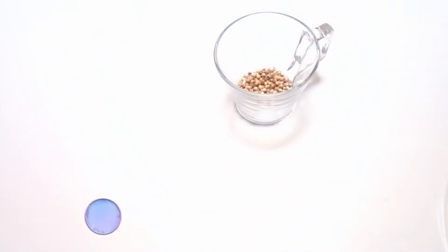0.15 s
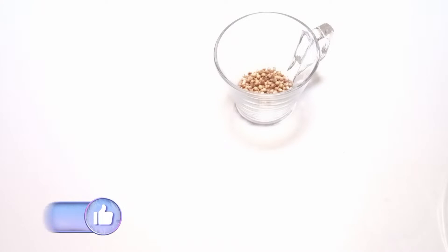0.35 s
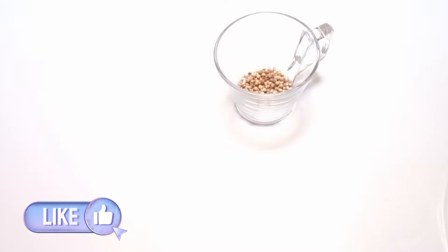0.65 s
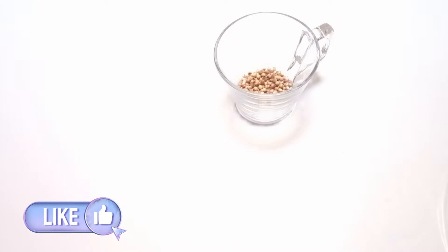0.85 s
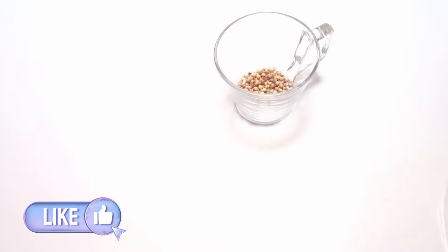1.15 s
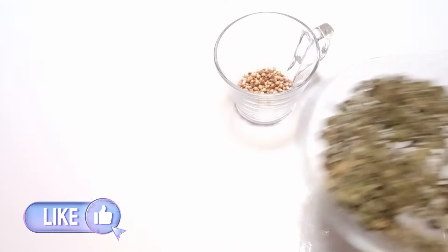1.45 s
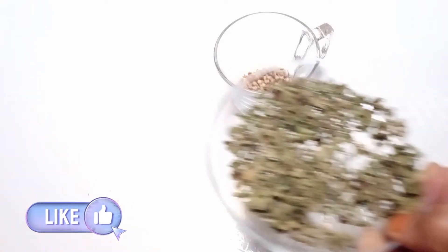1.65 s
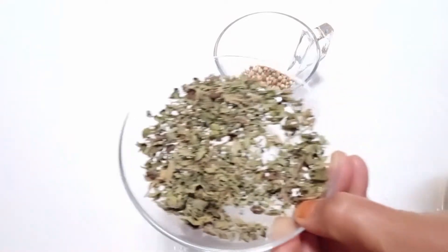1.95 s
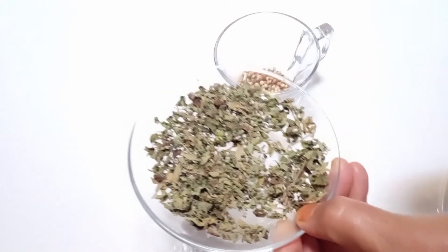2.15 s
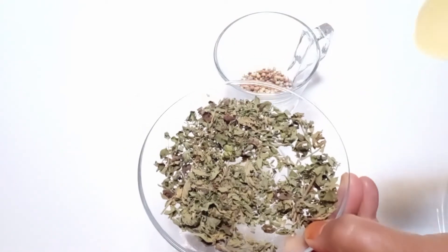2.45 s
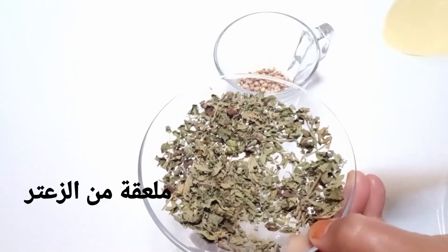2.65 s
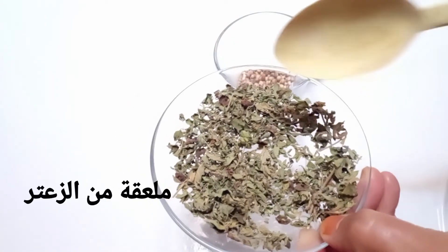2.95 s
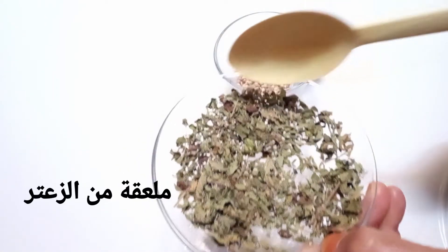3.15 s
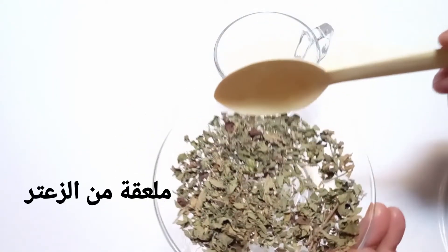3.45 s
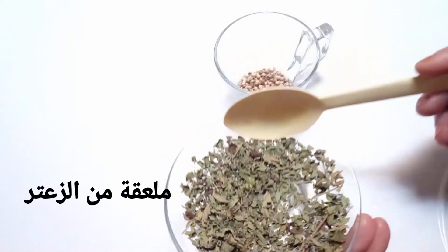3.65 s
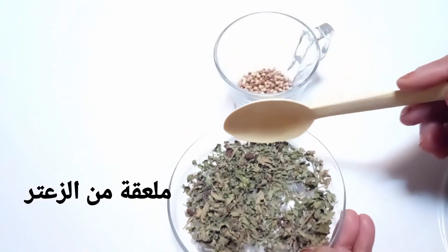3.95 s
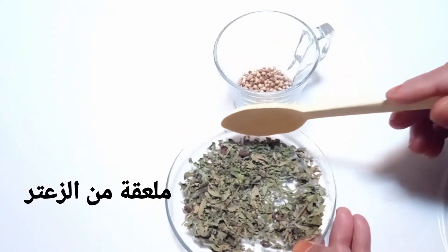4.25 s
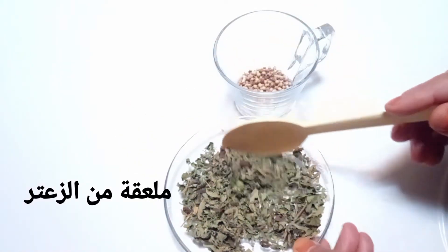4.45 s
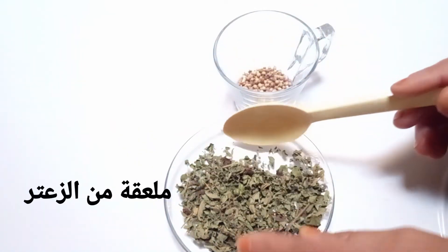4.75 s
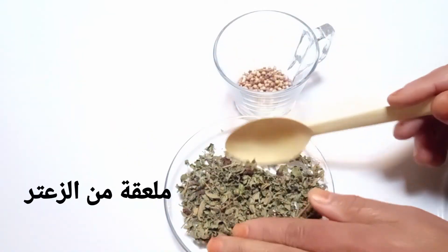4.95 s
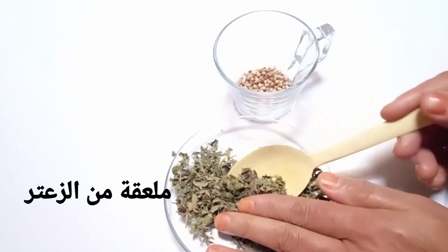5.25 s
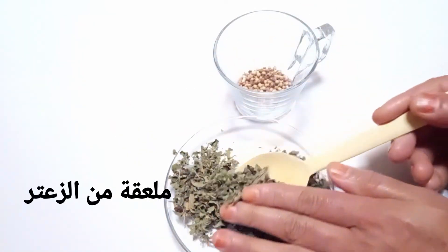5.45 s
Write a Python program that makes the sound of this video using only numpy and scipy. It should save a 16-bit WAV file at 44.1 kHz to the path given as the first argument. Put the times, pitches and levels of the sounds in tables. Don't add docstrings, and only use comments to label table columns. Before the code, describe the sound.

In a quiet room, a glass dish ticks faintly, is knocked sharply by a wooden spoon, thuds onto a table, and dry leaves crackle.

```python
import sys
import numpy as np
from scipy import signal
from scipy.io import wavfile
from scipy.ndimage import uniform_filter1d

SR = 44100
rng = np.random.default_rng(int(sys.argv[2]) if len(sys.argv) > 2 else 0)


def dump(signal):
    limited = np.clip(np.atleast_2d(signal).T, -1, 1)
    pcm = np.round(limited * 32767).astype(np.int16)
    wavfile.write(sys.argv[1], SR, pcm)


def nominal_scale(level):
    x = np.asarray(level, float) / 20
    return 10 ** x


N = 246959

# frequency in Hz, level in dB per Hz.
HUM_SPECTRUM = [(24, -38.5), (40, -4.5), (66, -7.5), (96, -22), (144, -12), (215, -15), (270, 0.5),
                (306, -17), (347, -7), (374, -16.5), (446, -13.5), (997, -29.5), (5780, -40.5),
                (10100, -39.5), (16200, -55.5)]
HUM_DB = -59
# time in seconds, hum swell in dB.
SWELL = [(0, -2.5), (.4, 1), (.75, 9), (1.1, 3.5), (1.6, 0.5), (2.601, -1.5), (3., 3.), (3.4, -2),
         (4.5, 1.), (5.6, 0.)]
# frequency in Hz, share of the swell.
SWELL_SHARE = [(60, 0.3), (300, 0.11), (1500, 0.79), (5000, 0.91), (12000, 0.14)]
# frequency in Hz, left-right likeness.
LIKENESS = [(60, 0.9), (130, 0.46), (290, 0.62), (640, -0.0064), (1410, -0.12), (3100, 0.058), (6820, -0.2),
            (15000, -0.098)]

# frequency in Hz, T60 in seconds, echo level in dB, left-right likeness.
ROOM = [(100, 0.28, -6, 1), (301.7, 0.7, -2.5, 0.97), (1010, 0.36, 0, .5), (2940, 0.4, -0.5, .1),
        (6000, 0.33, 0.5, .05), (10500, .3, -0.5, 0.044), (11300, .15, -28, .05), (12900, .15, -28, .05),
        (13600, .28, -5, .05), (15000, .12, -20.5, .05)]
SHIFT_HZ = 6.5

# start in seconds, level in dB.
BOOMS = [
    (.6, -60),
    (2.375, -58),
    (4.25, -52),
]
BOOM_HZ, BOOM_RISE_S, BOOM_T60_S = 66, .04, .7

# frequency in Hz, level in dB.
LEAF_SPECTRUM = [(1500, -36.5), (2500, -13), (4300, -11.5), (6500, -6.5), (9600, 0.5), (11000, -3.5),
                 (13000, -10.5), (15600, -11.5), (16200, -22.5)]
# start in seconds, level in dB, T60 in seconds.
JOLTS = [(0., -73, 0.77), (.495, -62, 1.02), (3.42, -69, 0.58), (4.44, -71, .6), (5.104, -59.5, 1.2),
         (5.497, -58.5, 0.76)]
JOLT_RISE_S = 0.0071
# middle in seconds, level in dB, half length in seconds.
STROKES = [(.58, -68.5, .06), (0.905, -77, 0.46), (1.134, -72, 0.053), (1.4, -76, .12), (1.69, -76, 0.24),
           (2.15, -89, .2), (2.89, -77.5, 0.089), (3.273, -79.5, 0.19), (3.7, -79.5, .2),
           (4.541, -68, 0.039), (4.635, -66, 0.075), (5.057, -78, 0.045), (5.21, -65, .05),
           (5.287, -58.5, 0.064), (5.394, -65.5, 0.16), (5.573, -59.5, 0.033)]
# start in seconds, peak level in dB, left-right difference in dB.
SNAPS = [(4.5246, -56, 5), (5.1054, -40.5, 11.5), (5.1084, -41, 1.0), (5.1186, -36, -2), (5.1325, -39, 1.5),
         (5.1384, -46, -1), (5.1446, -39, 5), (5.1516, -40.5, -1), (5.1597, -47, 12), (5.2053, -47, 13),
         (5.2674, -44, -8), (5.2804, -43, 10), (5.2978, -41, 4), (5.389, -51, 3), (5.499, -39.5, 6),
         (5.5187, -46, -4), (5.5546, -43, 2.0)]
SNAP_HZ, SNAP_SPREAD = 10000, .05
HISS_TOP_HZ, MIC_TOP_HZ = 15850, 16800

# start in seconds, peak level in dB,
# left-right difference in dB, centre in Hz, T60 in milliseconds.
HARD = [(0.493, -35, -2, 4800, 10), (2.3686, -23, -1.5, 3400, 6), (2.3676, -24, 0, 800, 9),
        (2.3681, -27, 0, 1600, 8.3), (3.4191, -43, -7, 9950, 30), (4.186, -41, -4, 700, 7),
        (4.1856, -28, -11, 5520, 6.1), (4.2393, -21.5, 3, 950, 3.1), (4.2424, -30, -8, 2300, 7),
        (4.269, -46, 3, 2000, 6), (4.793, -52, 4, 4020, 8.1), (4.793, -45, -0.5, 1360, 5.3),
        (5.0003, -46, 0, 888, 8.9), (4.9992, -56, -14, 2785, 6)]
# start in seconds, peak level in dB,
# left-right difference in dB, centre in Hz, T60 in milliseconds.
LIGHT = [(4.431, -35, -8, 10200, 8), (.003, -58.5, -3, 4030, 16), (0.4928, -44, -3, 2730, 9.8),
         (0.4995, -45, -17, 7500, 6), (.5497, -39.5, -12.5, 8400, 18), (.602, -59, -12, 7600, 14),
         (2.3757, -23, -8.5, 3800, 10.4), (4.074, -61, -2.5, 1550, 20), (4.251, -34.5, -4, 4200, 6),
         (4.258, -40, 3, 7000, 6), (4.567, -61, 6, 2500, 40), (4.9945, -55, 4.5, 12000, 7.7)]
HARD_WIDTH, LIGHT_WIDTH = 0.97, .42
# start in seconds, peak level in dB,
# left-right difference in dB, centre in Hz.
KNOCKS = [(2.3679, -18, 2, 1650), (2.3680, -17, -2, 3600), (2.3795, -33, 0, 1400), (2.3797, -34, 0, 3400),
          (4.1857, -40, 0, 500), (4.2385, -25, 0, 2200), (4.2422, -25, 0, 1700), (4.591, -58, 0, 2000)]

TABLE_HZ = [144, 189, 226, 298, 457, 586, 750]
# level in dB, T60 in seconds.
TABLE_MODES = [(-2, 0.13), (2.5, 0.11), (-3.5, 0.09), (-4, 0.11), (-15.5, .05), (-9.5, 0.045),
               (-15.5, 0.07)]
# time in seconds, level in dB, contact time in milliseconds.
THUDS = [(2.368, -33.5, 0.26), (4.185, -50.5, 0.59), (4.2383, -15, 0.54), (4.2425, -33, 2.9),
         (4.2692, -25, 1.5), (4.59, -38.5, 1.17), (4.70, -63, 3.1), (4.794, -63, 0.43), (4.9982, -40, 0.5),
         (5.024, -74, 1.5), (5.149, -50, 0.89), (5.24, -50.5, 1.4)]

RIM_HZ = [1647, 2125, 2440, 2837, 3470, 3520, 3625, 4645, 4680, 4890, 5480, 5580, 5733, 5865]
RIM_TOP_HZ = [6752, 7830, 7930, 9498, 10345, 13290, 13555, 13850, 14030]
TWIN_HZ = [3505, 4622, 4657, 5535, 5600, 6775, 7923, 10380, 13300, 13570, 14010, 4700, 5565, 5640, 7890,
           13520]
EDGE_HZ = [1622, 2445, 3480, 4738, 4900, 5575, 6750, 7903, 9502, 10370, 13217, 14023]
FOOT_HZ = [1209, 1620, 2131, 3424, 3480, 4670, 5570, 6750, 7850, 9515, 10385, 13240]
HELD_HZ = [4702, 6840, 9520, 9630, 13240]
SIDE_HZ = [2123, 2444, 3490, 4740, 6750, 7910]
BOWL_HZ = [1645, 2440, 3491, 5636, 6750, 9560]
LIP_HZ = [5600, 7910]
ROCK_HZ = [5570, 6750, 9510, 10380, 13230]
TICK_HZ = [4702, 6826, 9504, 13207]
# level in dB, left-right difference in dB,
# sign of the lobe facing right, T60 in seconds.
RIM = [(-35, 6.5, 1, 0.025), (-52, 7, 1, 0.47), (-54, -7.5, 1, .1), (-51, 4.5, 1, .08), (-30, -8, -1, 0.03),
       (-43.5, 6.5, -1, 0.11), (-37.5, 0, 1, 0.061), (-23, 7.5, -1, 0.035), (-35.5, 6, -1, 0.15),
       (-36, -4.5, 1, 0.1), (-33, 1.5, 1, 0.043), (-23, 3, 1, 0.025), (-31, -5, 1, 0.049),
       (-39.5, -7.5, 1, .08)]
RIM_TOP = [(-28, 16.5, -1, 0.046), (-38.5, -8, -1, .12), (-30, -6.5, 1, 0.018), (-29.5, 11.5, 1, 0.041),
           (-14.5, -1.5, 1, 0.016), (-41.5, 10, 1, 0.046), (-32, 18, -1, 0.021), (-45.5, 6.5, 1, .08),
           (-41, -1, -1, 0.053)]
TWIN = [(-55, 4.5, 1, 0.55), (-48, -1, 1, 0.26), (-42.5, 1, 1, 0.48), (-46, 5.5, 1, 0.24),
        (-51, 1, 1, 0.48), (-48, 6, 1, 0.22), (-51, 7.5, 1, 0.33), (-50.5, 5, 1, 0.28), (-62, 8, 1, .25),
        (-56, 8, 1, .27), (-62, 6, 1, .22), (-54, 3, 1, .4), (-54, -2, 1, .5), (-55, 3, 1, .45),
        (-55, 0, 1, .35), (-60, 8, 1, .25)]
EDGE = [(-41, 12, 1, 0.056), (-55, 6, 1, 0.23), (-36.5, 12, -1, 0.031), (-46.5, 7, -1, 0.3),
        (-45, 2, 1, 0.07), (-33, 1, 1, 0.023), (-40.5, 18, 1, 0.034), (-59, -8, 1, 0.07),
        (-31, 6.5, 1, 0.033), (-35, -2, -1, 0.017), (-44.5, 15, 1, .04), (-55, -3, -1, .06)]
FOOT = [(-44.5, 0, 1, 0.036), (-40, -1, 1, 0.061), (-70, -11, 1, 0.19), (-57, 19, 1, 0.27),
        (-49.5, -13, 1, 0.22), (-50, 5, 1, .12), (-30, 0, 1, 0.022), (-48, 8, 1, 0.056),
        (-42.5, 9, 1, 0.028), (-43, 12, -1, .05), (-41, 12, -1, 0.043), (-53, 15, 1, .04)]
HELD = [(-69.5, -1, 1, 0.087), (-66, 2, 1, 0.12), (-60, -12, 1, 0.057), (-65, 13, 1, 0.021),
        (-63, -15, 1, 0.036)]
SIDE = [(-57, 3, 1, .35), (-51, -4, 1, 0.09), (-64, 14, 1, 0.034), (-66, 7, -1, 0.22), (-69, 6, 1, .06),
        (-65.5, -2.5, 1, 0.1)]
BOWL = [(-50, 2, 1, 0.071), (-72, 2, 1, 0.5), (-65.5, 14, -1, 0.067), (-66, 11, -1, 0.045),
        (-68, 8, 1, .04), (-63.5, -5, 1, 0.065)]
LIP = [(-66.5, 0.0015, 1, .05), (-71, 0, 1, .06)]
ROCK = [(-49, 7, 1, 0.032), (-56, 4, 1, .04), (-44.5, 11, 1, 0.033), (-55, 10, 1, 0.083),
        (-55, 20, 1, 0.037)]
TICK = [(-66, 3, 1, 0.043), (-77, -5, 1, .08), (-58, -12, 1, 0.084), (-72, -14, 1, .04)]
PLACES = dict(
    rim=(RIM_HZ + RIM_TOP_HZ + TWIN_HZ, RIM + RIM_TOP + TWIN),
    edge=(EDGE_HZ, EDGE), foot=(FOOT_HZ, FOOT), held=(HELD_HZ, HELD), side=(SIDE_HZ, SIDE),
    bowl=(BOWL_HZ, BOWL), lip=(LIP_HZ, LIP), rock=(ROCK_HZ, ROCK), tick=(TICK_HZ, TICK),
    hum=([4740], [(-74.0, 0, 1, 1.3)]),
    wobble=([2441], [(-44, 1, 1, 0.5)]),
    note=([2441], [(-41, 1, 1, .52)]))
# start in seconds, strength in dB, place struck.
BLOWS = [(.196, -9, "held"), (.211, -7, "held"), (0.234, -6, "held"), (0.2521, -6, "held"),
         (.272, -10, "held"), (0.417, -0.5, "tick"), (2.368, 0, "rim"), (3.5, -14, "hum"),
         (4.1861, -1, "edge"), (4.1921, 1, "wobble"), (4.206, -21.5, "edge"), (4.2425, -1, "foot"),
         (4.2425, -1, "note"), (4.258, -15, "foot"), (4.365, -13.5, "rock"), (4.569, -8, "tick"),
         (4.707, -8, "lip"), (4.7257, -0.5, "lip"), (4.793, -5, "side"), (4.793, -24, "note"),
         (4.998, 0.5, "bowl"), (5.021, -27.5, "rock")]
GRIP_S, GRIP_T60_S = 4.45, 0.3
BLOW_RISE_S, WOBBLE_RISE_S = .0003, .025
NOTE_SENT_DB = -10
FLUTTER_DB, FLUTTER_MIN_HZ, FLUTTER_MAX_HZ, FLUTTER_ONSET_S = 2.5, 10, 70, .03


def evened(x):
    return x / np.sqrt(np.mean(x ** 2) + 1e-20)


def read(points, hz):
    f, value = np.transpose(points)
    return np.interp(np.log(hz + 1), np.log(f + 1), value)


def add(mix, s, sound):
    part = mix[:, round(s * SR):][:, :sound.shape[-1]]
    part += sound[..., :part.shape[1]]


def lean(db):
    return nominal_scale(np.array([[db / 2], [-db / 2]]))


def noise(level_db, patchy_db, size):
    hop = size // 4
    frames, hz = N // hop + 5, np.fft.rfftfreq(size, 1 / SR)[:, None]
    a, b, c, d, patches = rng.standard_normal((frames, len(hz), 5)).T
    patches = uniform_filter1d(patches, size=8, axis=0)
    patches = evened(uniform_filter1d(patches, size=10, axis=1))
    same = np.clip(read(LIKENESS, hz), -1, 1)
    left = a + 1j * b
    right = same * left + np.sqrt(1 - same ** 2) * (c + 1j * d)
    gain = nominal_scale(level_db(hz, np.arange(frames) * hop / SR) + patchy_db * patches)
    ports = np.array([left, right]) * gain
    return evened(signal.istft(ports, nperseg=size, noverlap=size - hop)[1][:, :N])


def burst(db, lean_db, hz, width_hz, t60_ms, draw):
    t = np.arange(draw.shape[1]) / SR
    puff = (draw[:2] * 0.65 + draw[2]) * nominal_scale(-60 * t / (t60_ms / 1000))
    puff = puff + 2.8 * (t == 0)
    r = np.exp(-np.pi * width_hz / SR)
    angle = 2 * np.pi * min(hz, SR / 2.2) / SR
    for _ in range(2):
        puff = signal.lfilter([1, 0, -1], [1, -2 * r * np.cos(angle), r * r], puff)
    return nominal_scale(db) * lean(lean_db) * puff / abs(puff).max()


def hum():
    s, swell_db = np.transpose(SWELL)

    def level_db(hz, t):
        return read(HUM_SPECTRUM, hz) + read(SWELL_SHARE, hz) * np.interp(t, s, swell_db)

    return nominal_scale(HUM_DB) * noise(level_db, patchy_db=1.6, size=2048)


def tail():
    taps = np.zeros((2, SR // 2))
    starts = np.arange(300, SR // 2 - 20, 20)
    at = starts + rng.integers(0, 20, (2, len(starts)))
    np.put_along_axis(taps, at, rng.choice([-1., 1.], at.shape), 1)
    hz, t, z = signal.stft(taps, SR, nperseg=256)
    corner_hz, *columns = np.transpose(ROOM)
    t60, back_db, same = (read(np.c_[corner_hz, c], hz)[:, None] for c in columns)
    same = np.clip(same, -1, 1)
    z = np.array([z[0], same * z[0] + np.sqrt(1 - same ** 2) * z[1]])
    echoes = signal.istft(z * nominal_scale(back_db - 60 * t / t60), SR, nperseg=256)[1]
    return echoes / np.linalg.norm(echoes[0])


def room(x, tails):
    everywhere = x.mean(0) + .5 * (x[0] - x[1])
    turn = 2 * np.pi * SHIFT_HZ * np.arange(N) / SR
    out = np.zeros((2, N))
    for share, echoes in zip((np.cos(turn), np.sin(turn)), tails):
        out += signal.fftconvolve((everywhere * share)[None], echoes, axes=1)[:, :N]
    return out


def booms():
    t, out = np.arange(SR // 2) / SR, np.zeros((2, N))
    swing = (1 - np.exp(-t / BOOM_RISE_S)) * np.sin(2 * np.pi * BOOM_HZ * t)
    for s, db in BOOMS:
        add(out, s, nominal_scale(db - 60 * t / BOOM_T60_S) * swing)
    return out


def stirring():
    t, power = np.arange(N) / SR, np.zeros(N)
    for s, db, t60 in JOLTS:
        rise = np.clip((t - s) / JOLT_RISE_S + 1, 0, 1)
        power += (nominal_scale(db - 60 * np.maximum(t - s, 0) / t60) * rise) ** 2
    for s, db, half_s in STROKES:
        power += nominal_scale(db) ** 2 * np.exp(-2 * ((t - s) / half_s) ** 2)
    return np.sqrt(power)


def leaves():
    slips = (rng.random(N) < 300 / SR) * nominal_scale(2.2 * np.minimum(rng.exponential(1, N), 4))
    grain = 1.6 + 0.22 * signal.lfilter([1], [1, -np.exp(-1 / (0.00058 * SR))], slips)
    hiss = noise(lambda hz, _: read(LEAF_SPECTRUM, hz), patchy_db=2.5, size=256)
    return stirring() * evened(hiss * grain)


def snaps():
    out = np.zeros((2, N))
    for s, db, lean_db in SNAPS:
        hz = SNAP_HZ * (1 + SNAP_SPREAD * rng.standard_normal())
        add(out, s, burst(db - 3.5, lean_db, hz, 5000, 6.7, rng.standard_normal((3, 900))))
    return out


def cracks():
    out = np.zeros((2, N))
    for rows, width in ((HARD, HARD_WIDTH), (LIGHT, LIGHT_WIDTH)):
        for s, db, lean_db, hz, t60_ms in rows:
            add(out, s, burst(db, lean_db, hz, width * hz, t60_ms, rng.standard_normal((3, 900))))
    for s, db, lean_db, hz in KNOCKS:
        add(out, s, burst(db, lean_db, hz, HARD_WIDTH * hz, 1, np.zeros((3, 900))))
    return out


def table():
    t, out = np.arange(SR // 2) / SR, np.zeros((2, N))
    board = np.zeros(len(t))
    for hz, (db, t60) in zip(TABLE_HZ, TABLE_MODES):
        board -= nominal_scale(db - 60 * t / t60) * np.cos(2 * np.pi * hz * t - .3)
    board *= 1 - 0.81 * np.exp(-t / 0.0034)
    no_bass = signal.butter(2, 115., "highpass", fs=SR, output="sos")
    board = signal.sosfilt(no_bass, board)
    for s, db, contact_ms in THUDS:
        contact_s = contact_ms / 1000
        push = np.exp(-.5 * ((t[:400] - contact_s) / (contact_s / 4)) ** 2)
        add(out, s - contact_s, nominal_scale(db) * np.convolve(board, push / push.sum()))
    return out


def flutter(t):
    pick, phase = rng.random((2, 5, 1))
    hz = FLUTTER_MIN_HZ * (FLUTTER_MAX_HZ / FLUTTER_MIN_HZ) ** pick
    waver = evened(np.sin(2 * np.pi * (hz * t + phase)).sum(0))
    return waver * np.minimum(t / FLUTTER_ONSET_S, 1)


def dish():
    t, out, sent = np.arange(SR // 2) / SR, np.zeros((2, N)), np.zeros((2, N))
    for s, blow_db, place in BLOWS:
        contact = 1 - np.exp(-t / (WOBBLE_RISE_S if place == "wobble" else BLOW_RISE_S))
        grip = nominal_scale(-60 * np.maximum(s + t - GRIP_S, 0) / GRIP_T60_S * (s < GRIP_S))
        sent_db = NOTE_SENT_DB if place in ("wobble", "note") else 0
        for hz, (db, lean_db, sign, t60) in zip(*PLACES[place]):
            waver_db = FLUTTER_DB * min(hz / 4600, 1) * flutter(t)
            level = nominal_scale(blow_db + db - 60 * t / t60 + waver_db)
            ring = level * np.sin(2 * np.pi * hz * t) * contact * grip
            ring = lean(lean_db) * [[1], [np.sign(sign)]] * ring
            add(out, s, ring)
            add(sent, s, ring * nominal_scale(sent_db))
    return out, sent


def scene():
    wood, clicks, snapping = table(), cracks(), snaps()
    hiss_limit = signal.firwin(511, HISS_TOP_HZ, window=("kaiser", 9), fs=SR)
    steady = signal.oaconvolve(snapping + leaves() + hum(), hiss_limit[None], "same")
    tails = tail(), tail()
    glass, sent = dish()
    wet = nominal_scale(-13) * sent + nominal_scale(-9.5) * wood + nominal_scale(-13.5) * (clicks + snapping)
    return glass + wood + clicks + room(wet, tails) + booms() + steady


def band_limit(x):
    return signal.sosfilt(signal.butter(12, 16820, fs=SR, output="sos"), x)


def record(dry):
    low_cut = signal.butter(4, 62., "highpass", fs=SR, output="sos")
    mix = signal.sosfilt(low_cut, dry)
    mix = signal.oaconvolve(mix, signal.firwin(255, MIC_TOP_HZ, fs=SR)[None], "same")
    return band_limit(mix)


dry = scene()
out = record(dry)
dump(out)
```